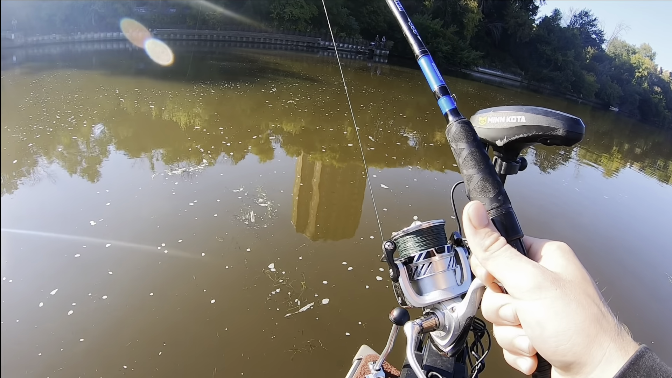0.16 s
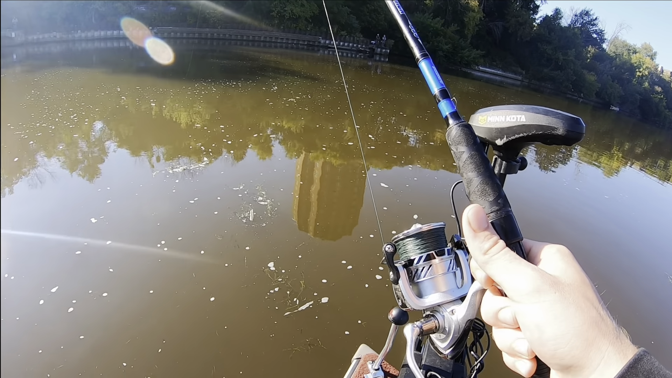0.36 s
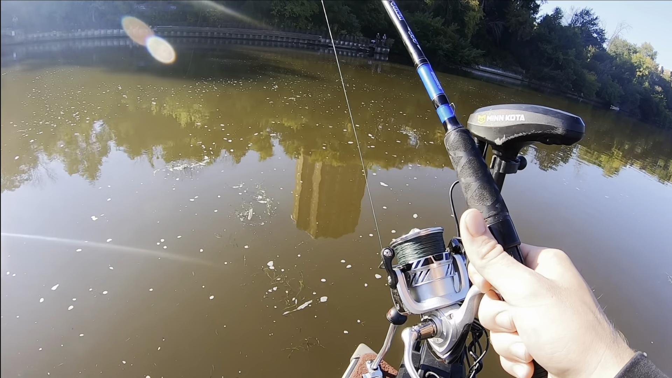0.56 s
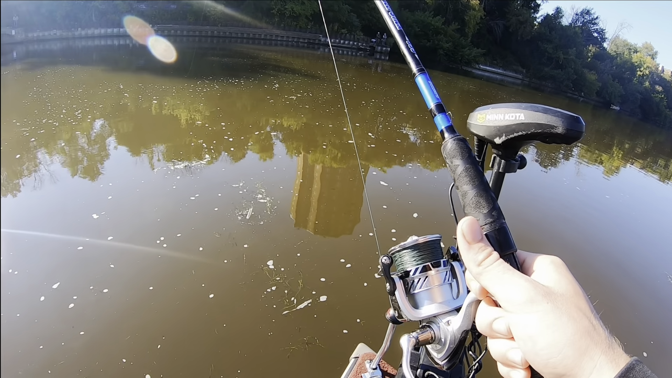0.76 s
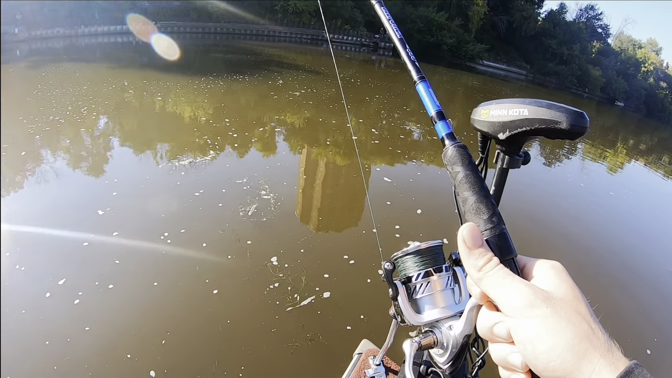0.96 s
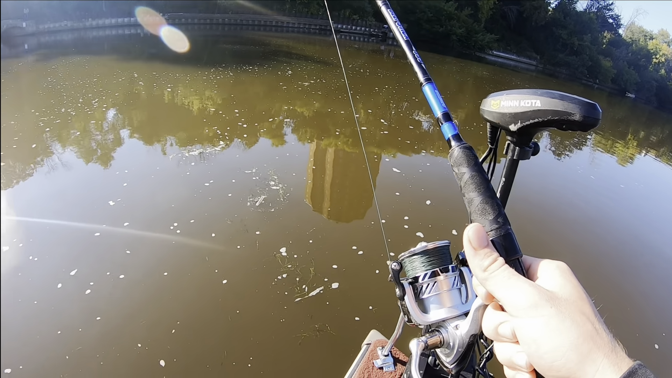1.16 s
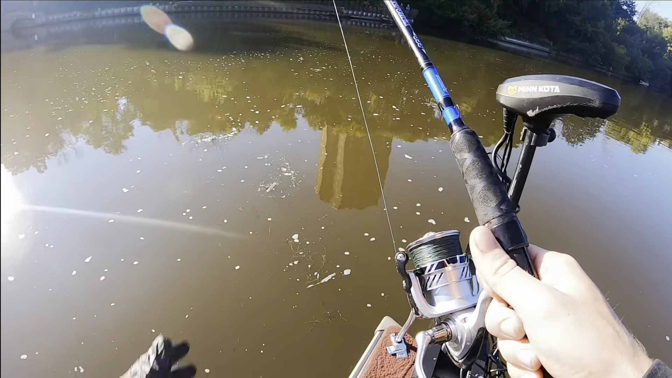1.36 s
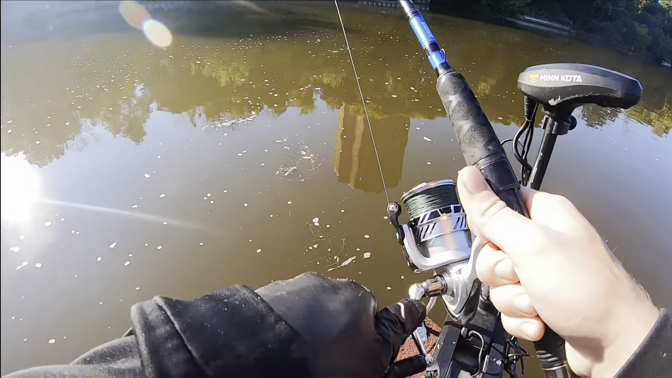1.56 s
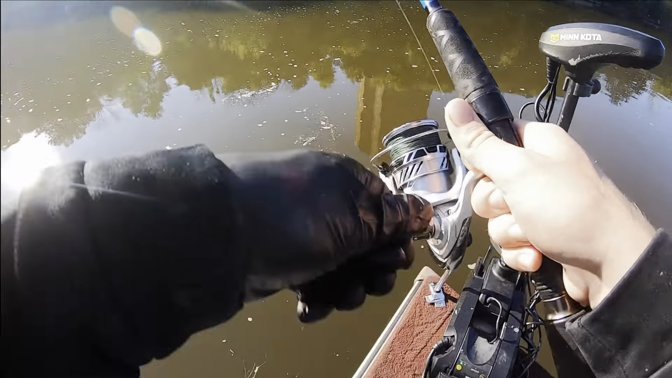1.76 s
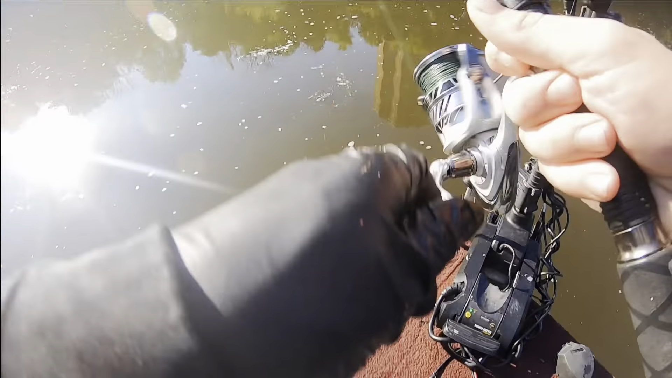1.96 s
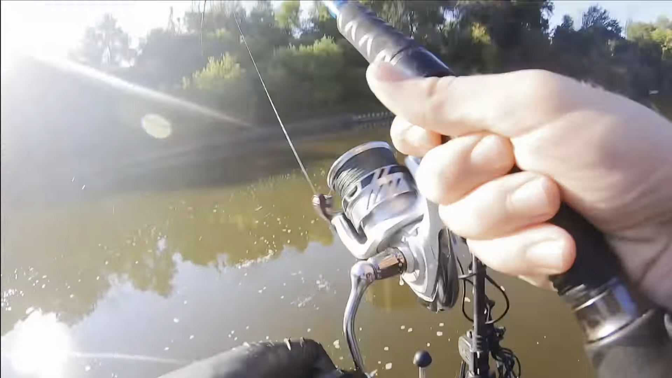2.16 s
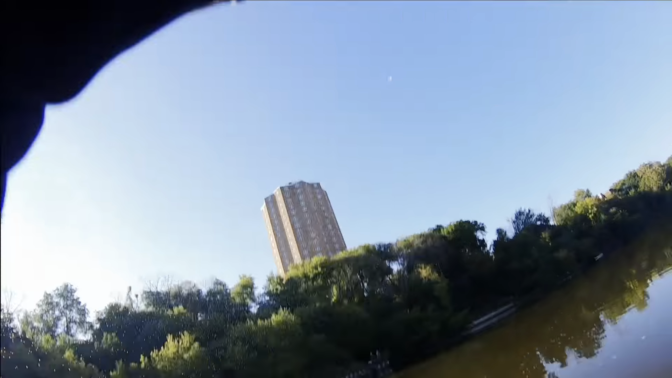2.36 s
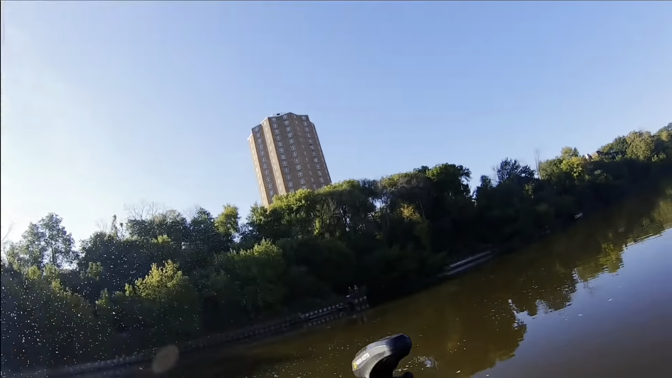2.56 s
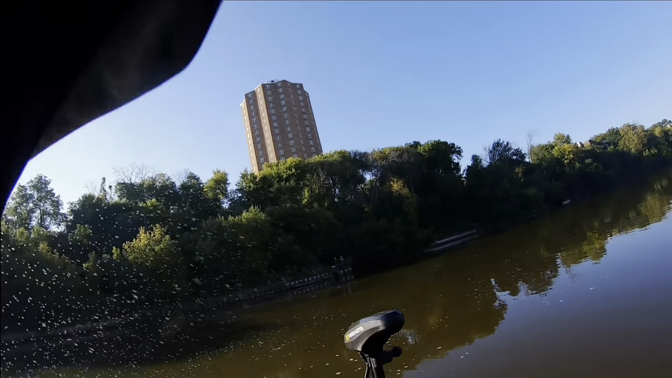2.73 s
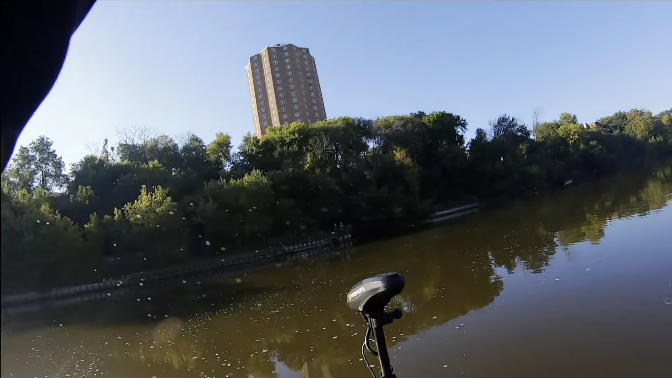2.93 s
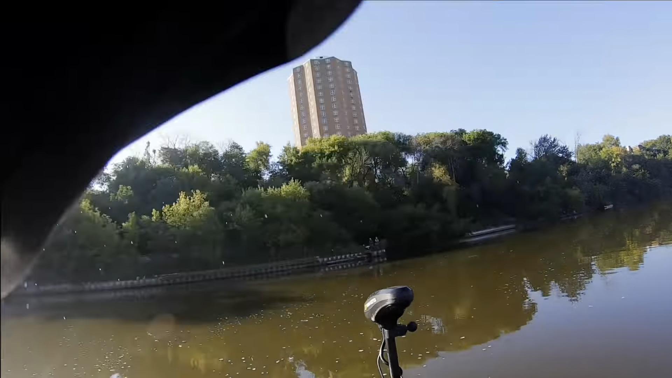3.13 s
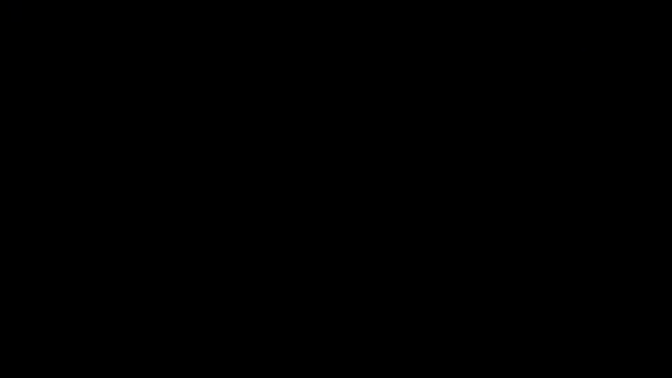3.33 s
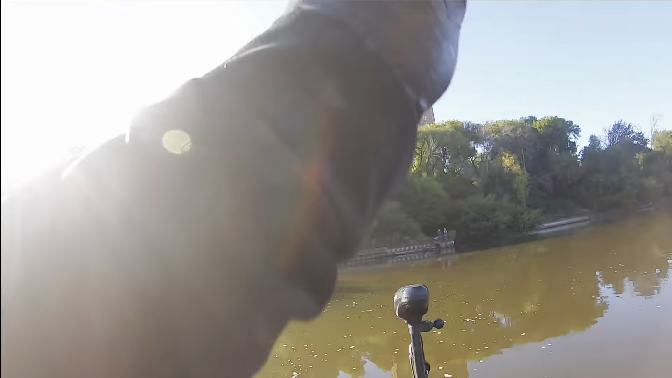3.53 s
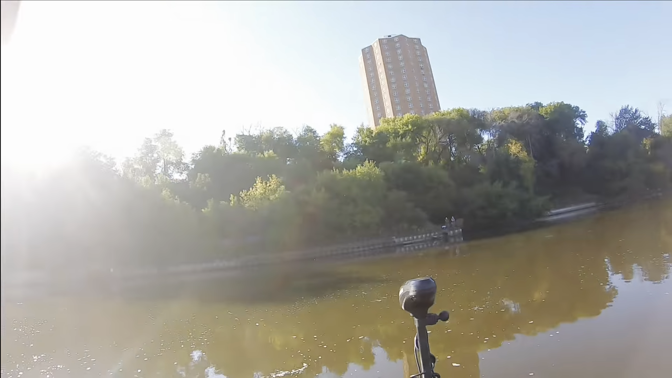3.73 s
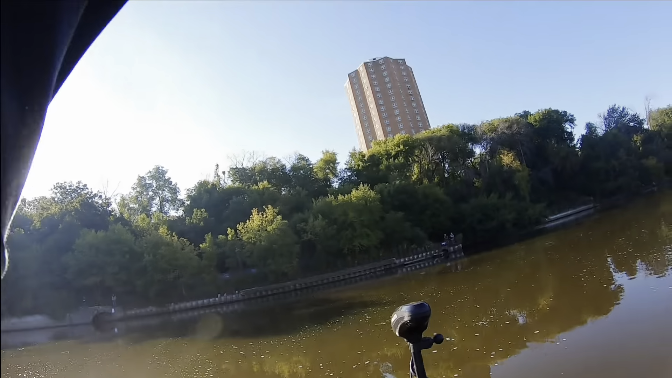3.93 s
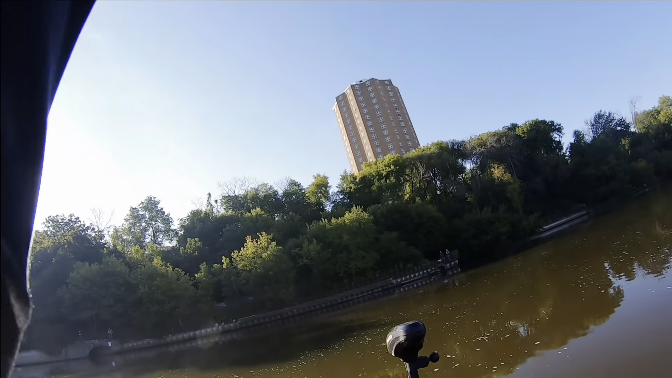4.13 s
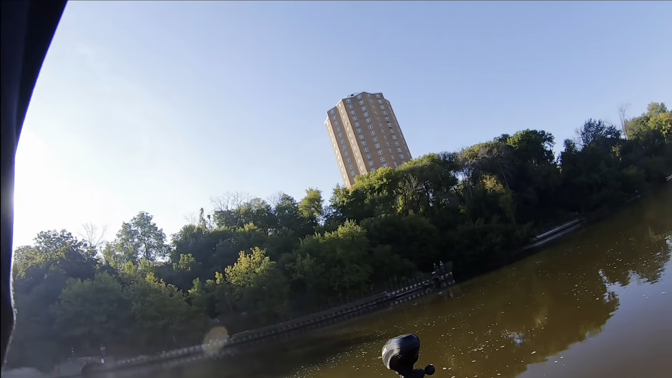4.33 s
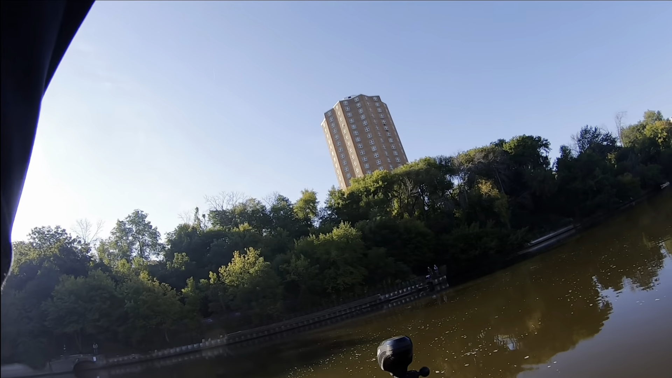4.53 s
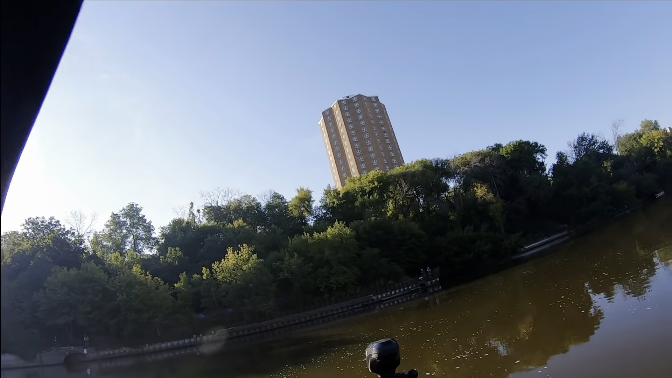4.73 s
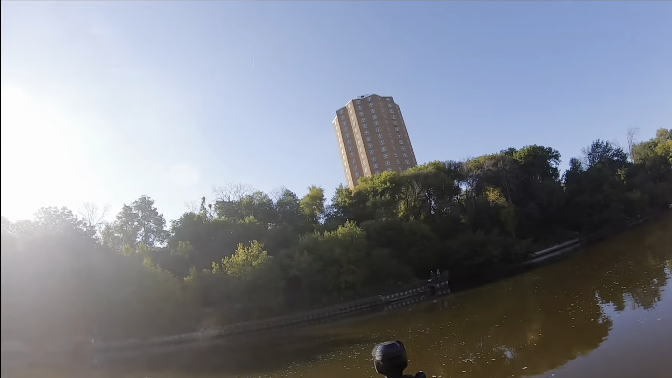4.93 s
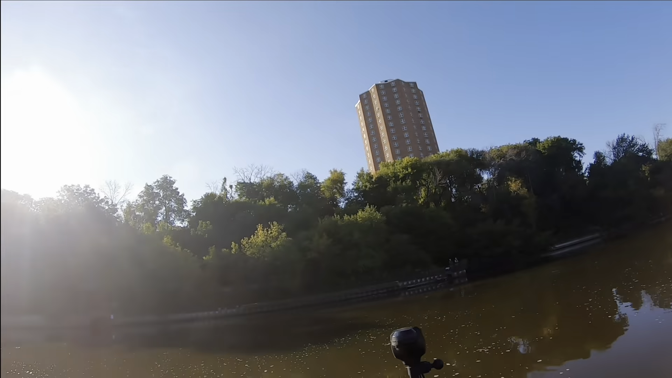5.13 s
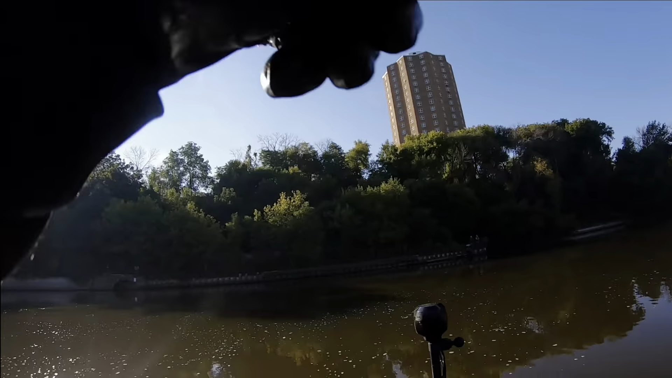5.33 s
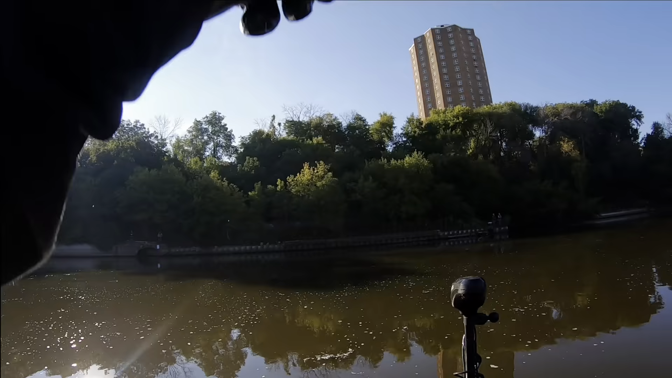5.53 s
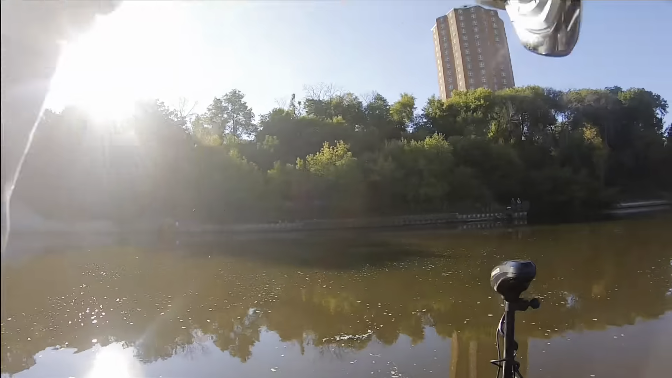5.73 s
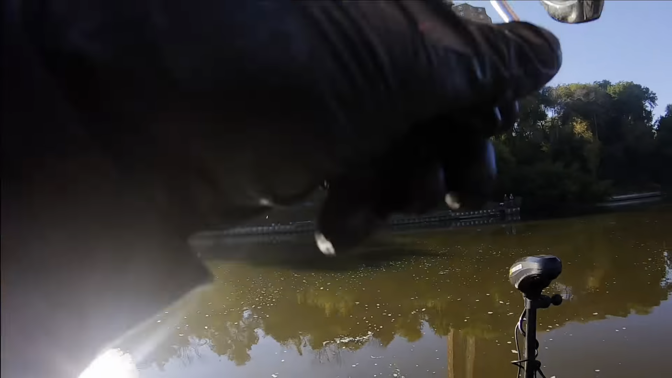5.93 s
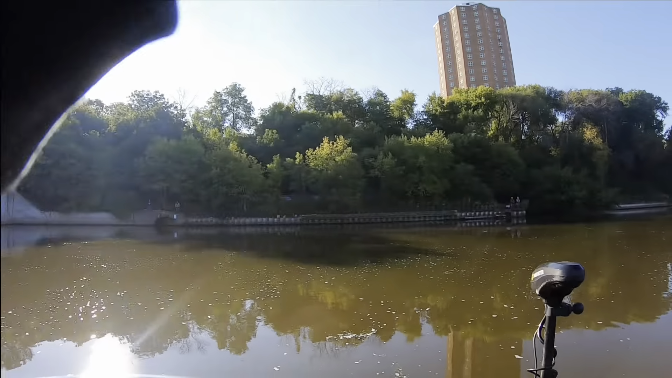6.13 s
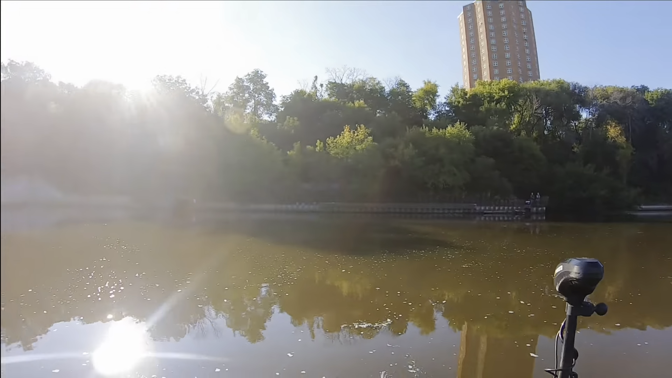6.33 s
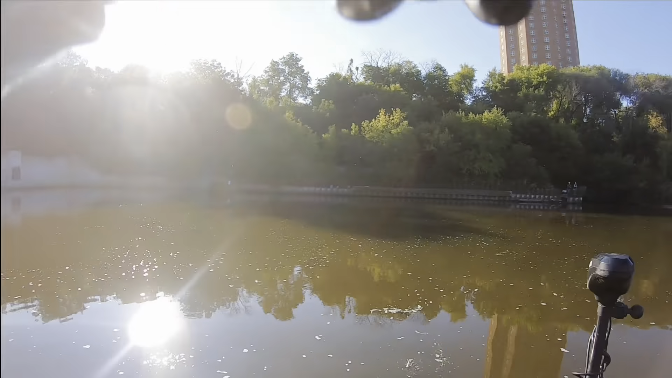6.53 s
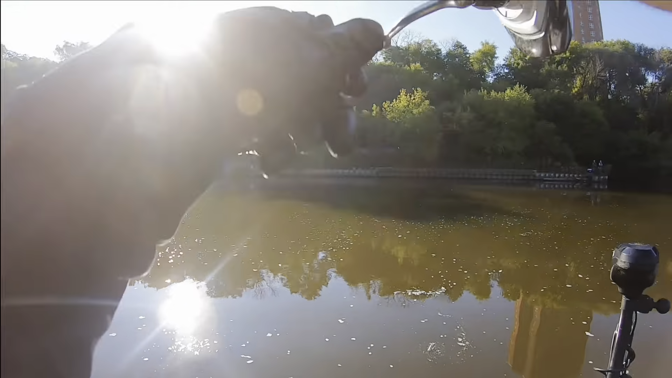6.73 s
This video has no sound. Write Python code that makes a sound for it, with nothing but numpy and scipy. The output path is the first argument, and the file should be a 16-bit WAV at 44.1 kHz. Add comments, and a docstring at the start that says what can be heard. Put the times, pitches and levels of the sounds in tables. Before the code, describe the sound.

A fishing reel's drag screams in repeated bursts as line is pulled out, with slow ratchet ticks, tackle clacks and jacket rustle over quiet open air.

```python
"""A hooked fish pulls line off a reel, heard from a camera on the angler's chest in a boat on a river.
First come slow ticks of the clicker over open-air hush and light wind; the jacket rustles and tackle clacks.
From about 1.9 s three runs make the clicker scream, while a sleeve sweeps across and the arm bumps the camera.
Slow ticks and clacks fill the gap from 3.7 to 5.1 s, then two more runs scream almost to the end.
Clicks and knocks ring tuned resonances; cloth, wind and hush are coloured noise under moving levels."""
import sys
import numpy as np
from scipy import signal
from scipy.fft import rfft, irfft
from scipy.io import wavfile
from scipy.ndimage import uniform_filter1d

SR = 44100
rng = np.random.default_rng(int(sys.argv[2]) if len(sys.argv) > 2 else 0)


def dump(signal):
    """Clip the signal to [-1, 1] and save it as 16-bit WAV at the path in sys.argv[1]."""
    limited = np.clip(np.atleast_2d(signal).T, -1, 1)
    pcm = np.round(limited * 32767).astype(np.int16)
    wavfile.write(sys.argv[1], SR, pcm)


N = 303408
T = np.arange(N) / SR
FREQS = np.maximum(np.fft.rfftfreq(4096, 1 / SR), 1)


def undb(db):
    """Decibels to gain."""
    return 10 ** (np.asarray(db) / 20)


def unit(x):
    """Scale to rms 1."""
    return x / np.sqrt(np.mean(x ** 2))


def curve(rows):
    """Each column of a table joined by straight lines in time."""
    time_s, *columns = np.transpose(rows)
    return [np.interp(T, time_s, column) for column in columns]


def filtered(x, order, cutoff_hz):
    """Highpass that runs forward in time."""
    return signal.sosfilt(signal.butter(order, cutoff_hz, "high", fs=SR, output="sos"), x)


def treble(x, order, cutoff_hz):
    """Treble above a cutoff, filtered both ways so it stays in step with the sound."""
    return signal.sosfiltfilt(signal.butter(order, cutoff_hz, "high", fs=SR, output="sos"), x)


def causal(gain):
    """Minimum-phase impulse response of these gains: its energy comes as early as possible."""
    cepstrum = irfft(np.log(gain + 1e-6))
    half = len(cepstrum) // 2
    # fold the backward half onto the forward half
    cepstrum[1:half] *= 2
    cepstrum[half + 1:] = 0
    return irfft(np.exp(rfft(cepstrum)))[:half]


def body(modes):
    """Impulse response of summed resonances; each width is taken at half gain."""
    peaks = [undb(db) / (1 + (2 * (FREQS - hz) / width_hz) ** 2) for hz, width_hz, db in modes]
    return causal(sum(peaks))


def colour(points):
    """Impulse response of a spectrum drawn in straight lines over log frequency."""
    hz, db = np.transpose(sorted(points))
    return causal(undb(np.interp(np.log(FREQS), np.log(hz), db)))


def ring(x, response):
    """Pass a sound through a response."""
    return signal.fftconvolve(x, response)[:len(x)]


def walk(rate_hz):
    """Random levels held for 1 / rate and slewed; rms 1."""
    hold = max(int(SR / rate_hz), 1)
    levels = np.repeat(rng.standard_normal(N // hold + 1), hold)
    return unit(uniform_filter1d(levels, hold)[:N])


def grainy(points, grain_db):
    """Coloured mono noise whose source flickers in level; rms 1."""
    source = rng.standard_normal(N) * undb(grain_db * walk(900))
    return unit(ring(source, colour(points)))


def noise(points, side_db, grain_db=0):
    """Stereo noise built from independent mid and side layers; rms 1."""
    mid = grainy(points, grain_db)
    side = undb(side_db) * grainy(points, grain_db)
    return unit(np.array([mid + side, mid - side]))


def patchy(x, patchy_db, size=512):
    """Let every narrow band of a sound swell and fade on its own."""
    spectra = signal.stft(x, nperseg=size)[2]
    chance = rng.standard_normal(spectra.shape[1:])
    chance = uniform_filter1d(chance, size=5, axis=0)  # over frequency
    chance = uniform_filter1d(chance, size=3, axis=1)  # over time
    return unit(signal.istft(spectra * undb(patchy_db * unit(chance)), nperseg=size)[1][:, :N])


def swells(rows, rest_gain):
    """Gain of round-topped swells that add in power to a resting gain."""
    power = rest_gain ** 2
    for middle_s, level_db, half_length_s in rows:
        shape = np.exp(-((T - middle_s) / half_length_s) ** 4 / 2)
        power = power + (undb(level_db) * shape) ** 2
    return np.sqrt(power)


def pan(sound, left_over_right_db):
    """Tilt the balance between left and right."""
    return sound * undb(np.array([[left_over_right_db], [-left_over_right_db]]) / 2)


def add(out, sound, start_s):
    """Mix a short stereo sound in at its start time."""
    i = max(int(start_s * SR), 0)
    out[:, i:i + sound.shape[1]] += sound[:, :N - i]


def strike(response, chatter_db, chatter_s):
    """One contact and the fine fading chatter after it, ringing a body; peak 1."""
    t = T[:len(response)]
    push = undb(chatter_db) * rng.standard_normal((2, len(t))) * np.exp(-t / chatter_s)
    push[:, 0] += 1
    sound = np.array([ring(channel, response) for channel in push])
    return sound / np.abs(sound).max()


# tugs of the fish, before the spool's mass rounds them:
# peak_s, top_speed [teeth per second], spin_up_s, run_down_s
TUGS = [(1.976, 2680, 0.2, 0.15), (2.009, 2640, 0.11, 0.1), (2.066, 2220, 0.18, 0.18),
        (2.1, 2480, 0.14, 0.096), (2.133, 2000, 0.11, .06), (2.185, 1150, .1, .055),
        (2.279, 1590, 0.03, 0.009), (2.52, 1340, 0.039, 0.1), (2.638, 790, 0.3, 0.24),
        (2.815, 1130, 0.096, 0.11), (2.887, 850, 0.097, 0.27), (2.939, 920, 0.09, 0.096),
        (3.0, 1230, 0.09, 0.16), (3.047, 1160, 0.056, 0.15), (3.099, 2050, 0.063, 0.12),
        (3.14, 1700, .1, 0.33), (3.225, 2450, 0.14, 0.18), (3.257, 2960, 0.065, 0.04),
        (3.345, 1980, 0.23, 0.12), (3.381, 2780, 0.049, 0.093), (3.475, 2000, 0.034, .1),
        (3.521, 2980, 0.072, 0.068), (3.55, 2340, 0.15, 0.18), (3.589, 2750, 0.13, 0.43),
        (5.235, 1740, 0.044, 0.36), (5.255, 1750, 0.089, 0.17), (5.294, 2050, 0.062, 0.14),
        (5.358, 2240, 0.079, 0.091), (5.403, 2600, 0.05, 0.057), (5.436, 2630, 0.068, 0.086),
        (5.485, 2410, 0.091, 0.1), (5.541, 1750, 0.093, 0.036), (5.609, 1920, 0.046, .12),
        (5.657, 2400, 0.066, 0.076), (5.707, 2370, 0.081, .1), (5.731, 2720, 0.047, 0.057),
        (5.763, 2790, 0.041, 0.075), (5.808, 2970, 0.031, 0.026), (5.87, 1360, 0.11, 0.33),
        (5.926, 2390, 0.059, 0.066), (6.061, 385, 0.24, .12), (6.34, 790, 0.058, 0.11),
        (6.391, 1650, 0.052, 0.087), (6.434, 3100, 0.047, 0.087), (6.462, 4550, 0.019, 0.029),
        (6.493, 2590, 0.041, 0.053), (6.55, 2290, 0.063, 0.088), (6.597, 1940, .13, 0.1),
        (6.652, 2740, 0.036, 0.07), (6.785, 1470, 0.037, 0.034), (6.858, 1410, 0.038, 0.051)]
CREEP_HZ, INERTIA_S = 250.8, 0.0061  # slowest speed [teeth per second]; rounding by the spool's mass


def spool_speed():
    """Teeth per second: the strongest tug of the moment drives the spool, whose mass smooths it."""
    tooth_hz = np.full(N, CREEP_HZ)
    for peak_s, top_hz, up_s, down_s in TUGS:
        tug = top_hz * np.exp(-np.abs(T - peak_s) / np.where(T < peak_s, up_s, down_s))
        tooth_hz = np.maximum(tooth_hz, tug)
    return uniform_filter1d(tooth_hz, max(int(INERTIA_S * SR), 1))


# pull on the line, one curve for each run of the fish: time_s, drag_level_db
PULL = [
    [(1.86, -61), (1.99, -29), (2.1, -31), (2.15, -33.5), (2.19, -38), (2.22, -54), (2.25, -47),
     (2.27, -20.5), (2.295, -40), (2.5, -45), (2.53, -34), (2.57, -59)],
    [(2.59, -49), (2.635, -39.5), (2.665, -44.5), (2.71, -47), (2.77, -43.5), (2.815, -27), (2.85, -44),
     (2.89, -35.5), (2.93, -38.5), (2.97, -46)],
    [(2.97, -37), (3.005, -29), (3.035, -34), (3.18, -27.5), (3.22, -24), (3.28, -31), (3.34, -23),
     (3.43, -31), (3.55, -25.5), (3.63, -36.5), (3.665, -25), (3.69, -59)],
    [(5.11, -46), (5.2, -24), (5.26, -24.5), (5.3, -24.5), (5.36, -20.5), (5.44, -18), (5.53, -26),
     (5.71, -22), (5.85, -23.5), (5.895, -28.5), (5.93, -24.5), (5.985, -24), (6.0, -43.5), (6.07, -37),
     (6.13, -48)],
    [(6.29, -39.5), (6.35, -26.5), (6.47, -22), (6.6, -25.5), (6.625, -28.5), (6.67, -24), (6.71, -22.5),
     (6.745, -31), (6.778, -24.5), (6.815, -38), (6.87, -20)],
]
# sound of each run: spring_rattle_db, judder [share of speed],
# treble_lift_db as the spool faces the camera, bass_cut_hz
CHARACTER = [(-13, 0.028, 12, 450), (-11, 0.026, 2, 1250), (-5, 0.042, 1.5, 1250), (-11, 0.031, 2, 1250),
             (-11, 0.028, 2, 1250)]
# resonances of the spool: pitch_hz, width_hz, level_db
SPOOL = [(995, 180, -11.5), (1834, 360, -3.5), (2291, 195, 6.5), (2614, 288, -1), (3325.6, 410, -23.5),
         (4280, 940, -25.5), (7680, 2300, -41.5)]
# reflections off the chest and the deck: delay_s, level_db
ECHOES = [(.0047, -20), (.0078, -12)]
# moments when a harmonic of the buzz crosses the spool's resonance and the buzz squeals: peak_s
SQUEALS_S = [3.0, 3.217, 3.548, 5.19, 5.214, 5.292, 5.356, 5.399, 5.447, 5.484, 5.555, 5.706, 5.774, 5.855,
             5.926, 5.974, 6.374, 6.426, 6.48, 6.557, 6.667, 6.709, 6.777, 6.868]
SQUEAL_DB, SQUEAL_HALF_S = 6, 0.0039
# the spool rocks on its shaft every few teeth, which puts side strands around the scream
ROCK_TEETH, ROCK_SHARE = 7.5, .06
WOBBLE_SHARE, TOOTH_SCATTER_DB, FLUTTER_DB = .024, 2.5, 5


def tooth_clicks(phase):
    """One click per tooth, placed between samples by a windowed sinc so the pitch stays clean."""
    place = SR * np.interp(np.arange(1, phase[-1]), phase, T)
    taps = place.astype(int)[:, None] + np.arange(-7, 9)
    offset = taps - place[:, None]
    shape = np.sinc(offset) * np.sinc(offset / 8)
    size = undb(TOOTH_SCATTER_DB * rng.standard_normal((len(place), 1)))
    return np.bincount(np.clip(taps, 0, N - 1).ravel(), (shape * size).ravel(), N)


def clicker(tooth_hz, pull, rattle_db, judder, lift_db, low_hz, side_db=-12):
    """One run: teeth flick the spring and ring the spool; the buzz flares as harmonics cross resonances."""
    start_s, end_s = pull[0][0], pull[-1][0]
    pull_db, = curve(pull)
    running = (T > start_s) & (T < end_s)
    # the spool judders as it turns
    rock = ROCK_SHARE * walk(60) * np.sin(2 * np.pi * np.cumsum(tooth_hz) / SR / ROCK_TEETH)
    uneven = 1 + rock + judder * walk(700) + WOBBLE_SHARE * walk(200)
    phase = np.cumsum(tooth_hz * uneven) / SR
    clicks = tooth_clicks(phase)
    # the spring rattles after each tooth
    rattle = rng.standard_normal((2, N)) * np.exp(-(phase % 1) / .6)
    drive = unit(clicks) / np.sqrt(tooth_hz / tooth_hz.mean()) + undb(rattle_db) * unit(rattle[0])
    # the buzz flares where a harmonic meets the spool's resonance
    flare = sum(np.exp(-((T - s) / SQUEAL_HALF_S) ** 2) for s in SQUEALS_S if start_s < s < end_s)
    force = undb(FLUTTER_DB * np.tanh(walk(260)) + SQUEAL_DB * flare)
    spool = body(SPOOL)
    # so small a spool radiates hardly any bass
    direct = filtered(ring(drive * force, spool), 2, low_hz)
    direct = direct + (undb(lift_db) - 1) * treble(direct, 3, 3600)
    buzz = direct + sum(undb(db) * np.roll(direct, int(delay_s * SR)) for delay_s, db in ECHOES)
    # the pull sets the strength over 90 ms; faster flares ride on it
    loudness = np.sqrt(uniform_filter1d(buzz ** 2, int(.09 * SR)) + 1e-12)
    strength = undb(pull_db) * uniform_filter1d(running * 1., 400) / loudness
    side = undb(side_db + pull_db) * running * unit(ring(rattle[1], spool))
    return buzz * strength + np.array([side, -side])


# the spool slips by a few teeth: start_s, teeth, spring_ring_db before scatter,
# knock_db and snap_db (both against the ring)
SLIPS = [(.6744, 1, -63.5, 4, 14), (0.706, 2, -63.5, 17, -3), (2.7174, 3, -42.5, 18, 1),
         (2.832, 1, -39, 12, 16.5), (2.8645, 1, -45, 21, 3), (3.644, 4, -53, -13, -19),
         (3.738, 5, -46.5, 19, 8), (3.849, 2, -50.5, 12.5, -4), (3.891, 2, -49.5, 20.5, 1),
         (3.9197, 1, -45, 23, 3), (4.0625, 1, -35, 3, -12), (4.1613, 1, -42, 7.5, -2),
         (4.2982, 3, -43.5, 12, 4), (4.345, 4, -49.5, 12, 19), (4.4117, 1, -46, 14, 17.5),
         (4.503, 2, -49, 19.5, 15), (4.5531, 1, -43.5, 8, 11.5), (4.594, 1, -42.5, -6, 3),
         (4.6575, 1, -43.5, 11, 11), (4.68, 1, -46, 10, 9), (4.7095, 1, -47.5, 15.5, 11),
         (4.978, 2, -46, 20, -10), (5.012, 2, -36, 11.5, -12), (6.029, 18, -43, -7, -18),
         (6.7241, 1, -35, 12, 4)]
# the clicker spring: pitch_hz, width_hz, level_db
SPRING = [(4460, 370, 8.5), (6700, 110, 2), (8100, 180, -13), (11400, 270, -16)]
# the dull knock of the pawl: pitch_hz, width_hz, level_db
PAWL = [(2300, 1120, 1.5), (3600, 2200, -8)]
# the bare contact: pitch_hz, width_hz, level_db
SNAP = [(2430, 960, 6.5), (4200, 2490, 15.5), (7930, 700, 16), (11800, 1800, 6.5), (14300, 1400, -19)]
TOOTH_GAP_S, TICK_SCATTER_DB = 0.0155, 2.5


def ticks():
    """Slow single teeth ring the clicker spring, with a pawl knock and a contact snap set for each slip."""
    out = np.zeros((2, N))
    spring, pawl, contact = body(SPRING), body(PAWL), body(SNAP)
    for start_s, teeth, ring_db, knock_db, snap_db in SLIPS:
        for tooth in range(round(teeth)):
            ping = strike(spring, chatter_db=-30, chatter_s=.003)
            knock = strike(pawl, chatter_db=-21.5, chatter_s=0.011)
            snap = strike(contact, chatter_db=-2.5, chatter_s=0.003)
            tick = ping + undb(knock_db) * knock + undb(snap_db) * snap
            # teeth after the first come a little early or late
            shift = .1 * min(tooth, 1) * rng.standard_normal()
            level = undb(ring_db + TICK_SCATTER_DB * rng.standard_normal())
            add(out, level * tick, start_s + (tooth + shift) * TOOTH_GAP_S)
    return out


# clacks of the handle, bail and rod: start_s, peak_db, treble_db (against the body),
# handle_ring_db (added to the handle's levels), chatter_s
CLACKS = [(1.6645, -15, 7, 10, 0.0022), (1.6713, -27, -10, 6, .003), (1.7465, -17.5, -6, -11, 0.0036),
          (2.304, -8, -6, -14, 0.0044), (2.3133, 2, 6, -12, .0018), (3.9435, -21.5, -10, -31, 0.0035),
          (4.094, -21.5, -15, -27, 0.014), (4.784, -24, -42, -34, 0.0036), (4.9508, -16, -12, -29, .004),
          (4.9623, -23, -26, -8, 0.0096), (5.06, -18.5, -32, -9, 0.0042), (6.7454, -10, -9, -24, 0.00094)]
# resonances of the tackle: pitch_hz, width_hz, level_db
TACKLE = [(890, 630, 4), (1780, 250, 13.5), (2540, 1500, 12.5), (4360, 460, 14), (6800, 670, 5),
          (8140, 2700, -1.5), (11900, 3700, -28)]
# resonances of the handle: pitch_hz, width_hz, level_db before each clack's ring
HANDLE = [(1220, 190, 17), (1540, 390, 24), (5600, 430, 12), (7840, 400, 11), (8730, 400, 11.5)]


def clacks(split_hz=3200):
    """Short hard knocks of the tackle, each with its own treble, handle ring and chatter."""
    out = np.zeros((2, N))
    for start_s, peak_db, treble_db, ring_db, chatter_s in CLACKS:
        modes = TACKLE + [(hz, width_hz, db + ring_db) for hz, width_hz, db in HANDLE]
        modes = [(hz, width_hz, db + treble_db * (hz > split_hz)) for hz, width_hz, db in modes]
        add(out, undb(peak_db) * strike(body(modes), chatter_db=-17, chatter_s=chatter_s), start_s)
    return out


# the arm bumps the camera: peak_s, thud_db at the peak, scuff_db (against the thud),
# fade_s (each way, to 1/e)
BUMPS = [(2.093, -42, 4.5, 0.016), (2.194, -40, 5.5, 0.013), (2.252, -37, 7.5, 0.031),
         (2.546, -43, 15.5, 0.015), (2.769, -22.5, -15, 0.0082), (2.844, -26, -2.5, 0.0089),
         (3.142, -25, -13, 0.024), (3.387, -4.5, -10.5, 0.0088), (3.443, -30.5, -1.5, 0.038),
         (4.19, -51, -1, 0.11), (5.528, -23, -6.5, 0.0028), (5.593, -25.5, -5, 0.0043),
         (5.64, -27, -7, 0.016), (5.72, -21, -7, 0.012), (6.54, -22.5, -8, 0.0085),
         (6.782, -25, -7.5, 0.0079)]
# spectrum of the housing's thud: pitch_hz, level_db
THUD = [(20, 0), (60, -2), (115, -12), (165, 7.5), (220, -10), (300, -2.5), (390, -18), (900, -74),
        (3000, -66)]
# spectrum of the cloth's scuff: pitch_hz, level_db
SCUFF = [(100, -18), (400, 7), (650, 10), (1100, 5), (1800, -5), (3200, -12), (8000, -17.5), (11000, -27),
         (15000, -65)]


def bumps():
    """Soft blows swell and fade: a thud of the housing and a scuff of cloth."""
    thud, scuff = noise(THUD, side_db=-6.5), noise(SCUFF, side_db=-2.5, grain_db=4.5)
    out = np.zeros((2, N))
    for peak_s, thud_db, scuff_db, fade_s in BUMPS:
        near = np.abs(T - peak_s) < 6 * fade_s
        swell = np.exp(-np.abs(T[near] - peak_s) / fade_s)
        blow = unit(swell * thud[:, near]) + undb(scuff_db) * unit(swell * scuff[:, near])
        out[:, near] += undb(thud_db) * np.sqrt(np.mean(swell ** 2)) * blow
    return out


# the sleeve sweeps right across the camera: time_s, level_db, rib_rate_hz (ribs of the weave)
SWIPE = [(2.32, -41, 640), (2.355, -37.5, 760), (2.39, -33.5, 770), (2.44, -31.5, 770), (2.49, -33.5, 670),
         (2.53, -41.5, 460), (2.56, -68, 420)]
# spectrum of the sweep: pitch_hz, level_db
SWIPE_TONE = [(800, -7.5), (1950, 0), (2250, 3.5), (3200, -7.5), (4600, 1), (6500, -11.5), (7500, -0.5),
              (9200, -10), (10000, -1.5), (10700, -17), (14000, -22), (15500, -44)]


def swipe():
    """The ribbed sleeve zips across the housing: a hiss with a whistle that follows the arm's speed."""
    level_db, rib_hz = curve(SWIPE)
    phase = np.cumsum(rib_hz * (1 + .022 * walk(500))) / SR
    # one pulse per rib, with the steady part taken out
    pulses = np.diff(np.floor(phase), prepend=0) - rib_hz / SR
    whistle = unit(ring(pulses, colour(SWIPE_TONE)))
    hiss = patchy(noise(SWIPE_TONE, side_db=-10), patchy_db=5.5)
    # a light touch whistles; pressed harder, the hiss takes over
    sound = hiss * undb(level_db - level_db.max()) + undb(-7) * whistle
    touching = (T > SWIPE[0][0]) & (T < SWIPE[-1][0])
    return pan(touching * undb(level_db) * sound / sound[:, touching].std(), 3)


# strokes of the sleeve over the jacket: middle_s, level_db before trim, half_length_s
STROKES = [(.43, -71.5, 0.1), (.74, -66, 0.078), (1.517, -41.5, 0.015), (1.6, -51.5, 0.28),
           (2.0, -45.5, 0.15), (2.14, -38.5, 0.082), (2.24, -37, 0.016), (2.288, -32, 0.03),
           (3.56, -43.5, 0.1), (4.09, -60, 0.057), (4.88, -51.5, 0.18), (6.8, -48, 0.33)]
# the jacket rustles as the arm moves and settles when the rod is held: time_s, level_db before trim
RUSTLE = [(1.25, -86), (1.42, -57.5), (3.9, -53), (4.0, -59), (4.7, -60.5), (5.2, -59), (6.2, -58)]
# spectrum of the nylon, before the added sizzle: pitch_hz, level_db
NYLON = [(300, -25.5), (800, 12), (1300, 13), (2000, 11.5), (3400, 10), (4500, 7.5), (5500, 2.5), (6600, 0),
         (7500, 4.5), (9000, -6), (9900, -5.5), (10600, -18.5), (13000, -13.5), (15500, -28.5)]


def sleeve(trim_db=-1, sizzle_db=7, sizzle_hz=6300):
    """Nylon threads catch and slip in a grainy hiss that brightens when pressed harder."""
    slide = swells(STROKES, undb(curve(RUSTLE)[0] + 2 * walk(8.9)))
    hiss = patchy(noise(NYLON, side_db=-2.5, grain_db=2.5), patchy_db=3.5)
    sizzle = undb(sizzle_db) * (slide / slide.max()) * treble(hiss, 2, sizzle_hz)
    return slide * undb(trim_db + 2.3 * walk(98)) * (hiss + sizzle)


# the jacket presses on the housing as the rod comes up: time_s, rubbing_db before trim
PRESS = [(0, -46), (1.9, -44), (2.2, -36), (2.7, -42), (3.3, -35), (3.95, -38.5), (4.2, -32), (4.55, -35.5),
         (5.6, -37), (6.1, -35.5), (6.8, -31.5)]
# spectrum of the rubbing: pitch_hz, level_db
RUB = [(65, -25), (110, 2.5), (193, 2.5), (281, -9), (466, -12.5), (547, -11.5), (826, -22.5), (1050, -32),
       (1310, -48), (1700, -32.5), (2210, -26.5), (3740, -120)]


def jacket_rub(trim_db=-1):
    """The jacket rubs the housing: a low, unsteady noise that follows the pressure."""
    pressing_db, = curve(PRESS)
    return pan(undb(pressing_db + trim_db + 2 * walk(25)) * noise(RUB, side_db=-1.5), -6)


# gusts at the ports: middle_s, level_db before trim, half_length_s
GUSTS = [(2.095, -19, 0.022), (2.44, -29, 0.11), (3.38, -29, 0.041), (3.66, -24, 0.15), (3.94, -29, 0.03),
         (4.62, -32.5, 0.23), (6.55, -30.5, 0.077)]
# spectrum of the wind: pitch_hz, level_db
WIND = [(15, -20.5), (30, -1.5), (70, -8.5), (140, -13), (300, -51.5), (1000, -102)]


def wind(breeze_db=-45, trim_db=-2):
    """Gusts buffet the ports as low, flickering noise over a steady breeze."""
    return swells(GUSTS, undb(breeze_db)) * undb(trim_db + 2 * walk(24)) * noise(WIND, side_db=-10.5)


# spectrum of the open-air hush: pitch_hz, level_db
HUSH = [(15, -45), (25, -10.5), (87, -0.5), (168, -29), (244, -14), (326, -18.5), (425, -21.5),
        (940, -30.5), (1290, -29.5), (2570, -45), (3100, -55), (8930, -65.5), (14000, -127)]


def river_hush(level_db=-42.5):
    """Almost steady open-air noise from the river bank, leaning to the right."""
    return pan(undb(level_db + .7 * walk(5)) * noise(HUSH, side_db=-3), -6)


def scene():
    """The reel in front, the angler's jacket and the open air around it."""
    tooth_hz = spool_speed()
    drag = sum(clicker(tooth_hz, pull, *character) for pull, character in zip(PULL, CHARACTER))
    reel = drag + ticks() + clacks()
    jacket = bumps() + swipe() + sleeve() + jacket_rub()
    return reel + jacket + wind() + river_hush()


# the stereo image closes up: time_s, side_db
WIDTH = [(2.45, 0.5), (2.65, -8.5), (3.0, -48.5)]
TOP_HZ = 15500


def record(dry):
    """The image narrows; the camera cuts the lowest rumble and the top, and the hardest peaks are clipped."""
    width_db, = curve(WIDTH)
    mid = dry.mean(axis=0)
    x = filtered(mid + undb(width_db) * (dry - mid), 2, 18)
    lowpass = signal.ellip(8, .2, 70, TOP_HZ, fs=SR, output="sos")
    return signal.sosfilt(lowpass, np.clip(x, -.85, .85))


dry = scene()
out = record(dry)
dump(out)
```